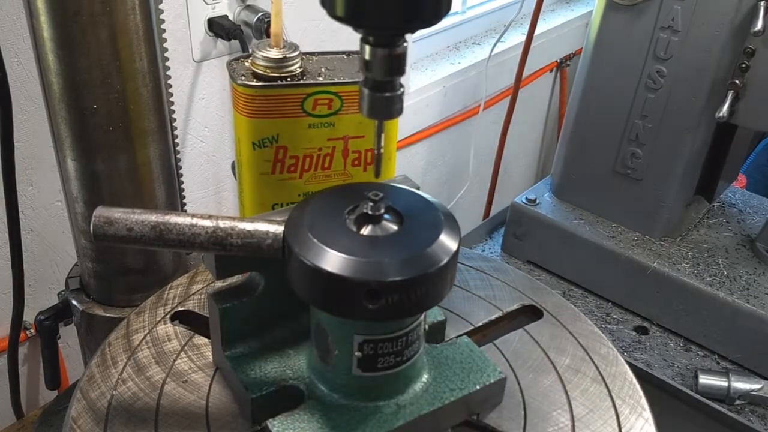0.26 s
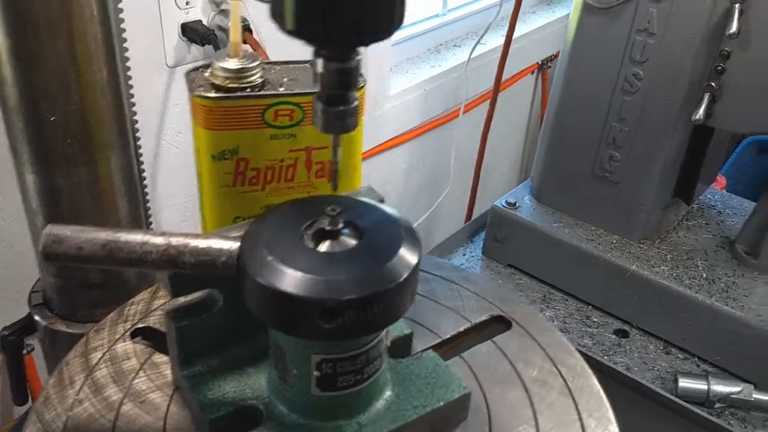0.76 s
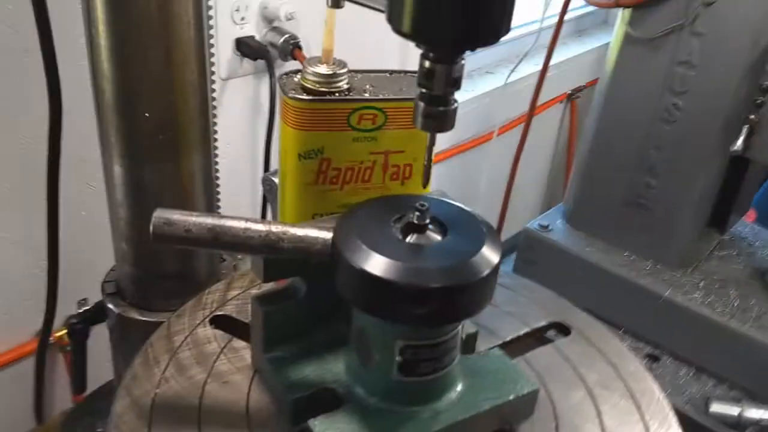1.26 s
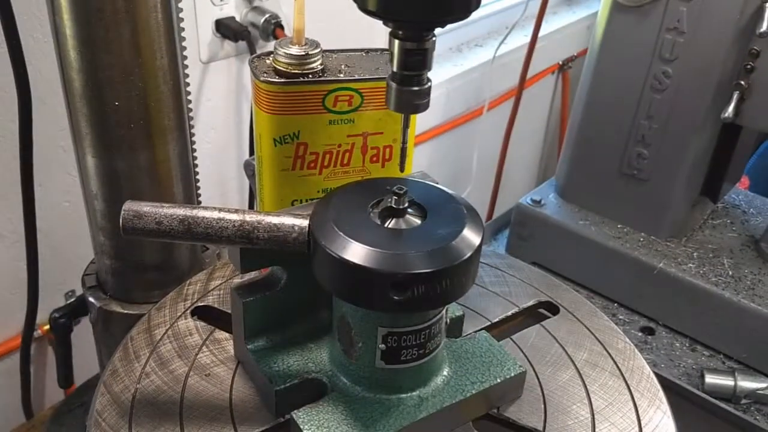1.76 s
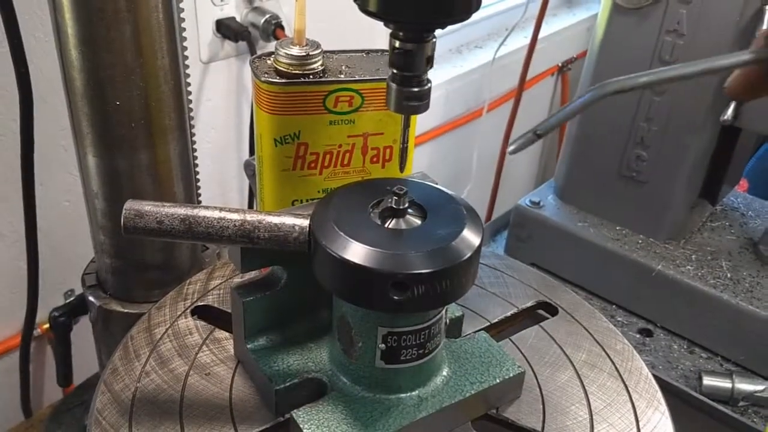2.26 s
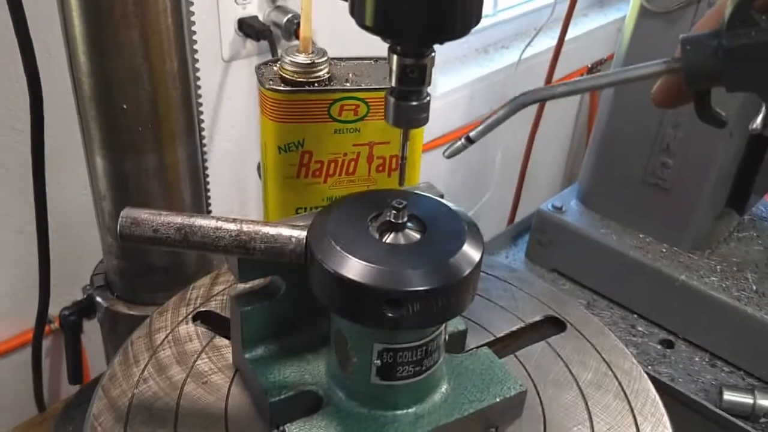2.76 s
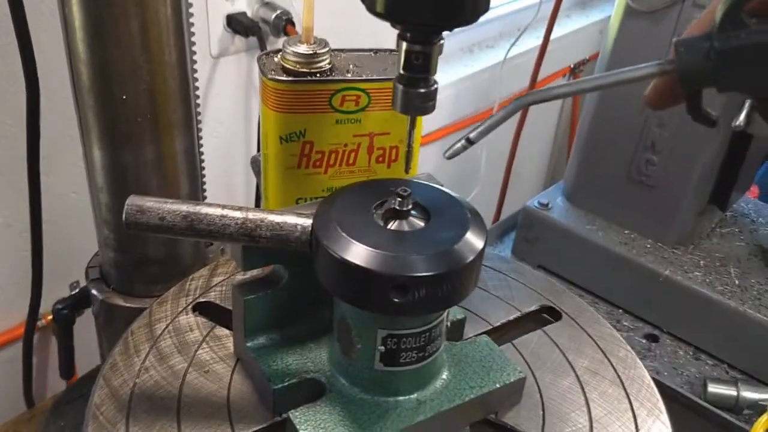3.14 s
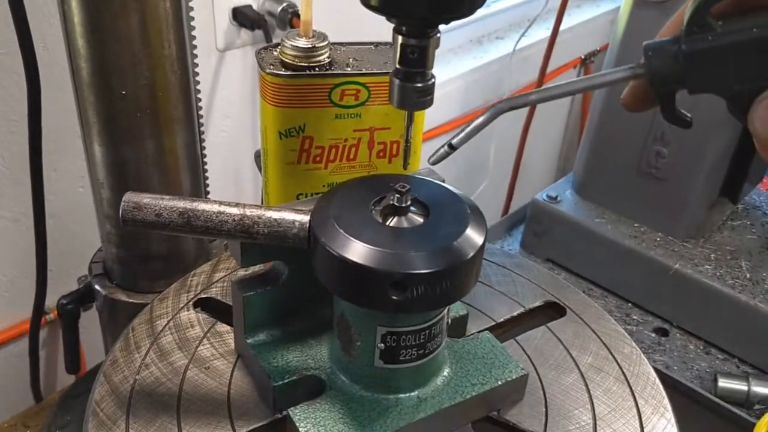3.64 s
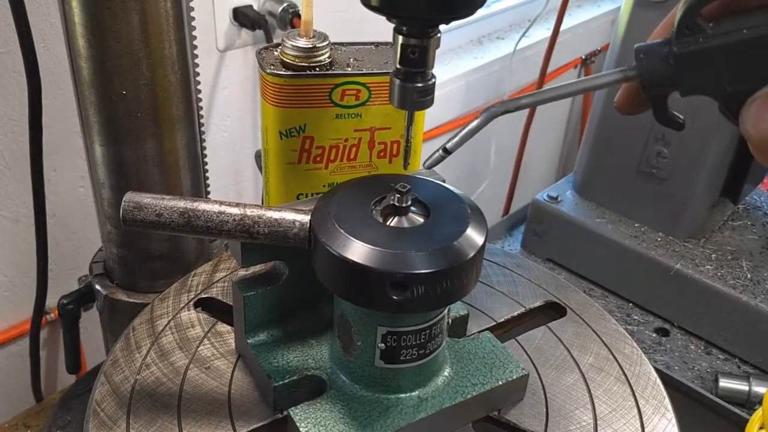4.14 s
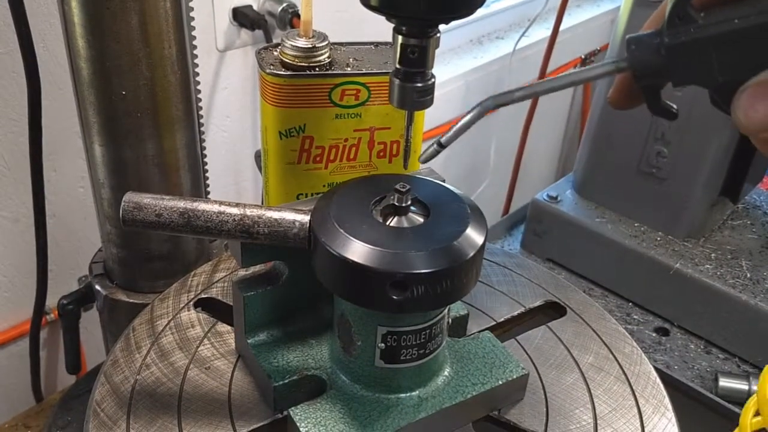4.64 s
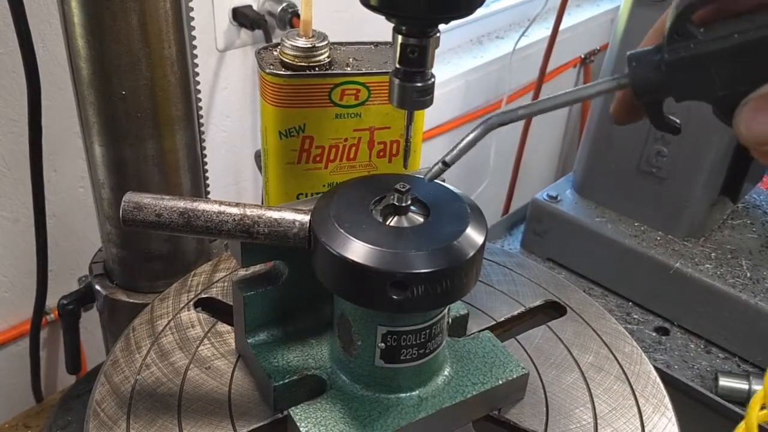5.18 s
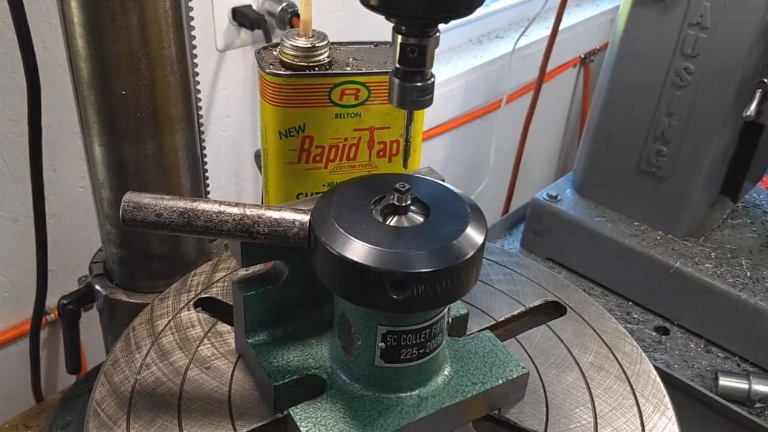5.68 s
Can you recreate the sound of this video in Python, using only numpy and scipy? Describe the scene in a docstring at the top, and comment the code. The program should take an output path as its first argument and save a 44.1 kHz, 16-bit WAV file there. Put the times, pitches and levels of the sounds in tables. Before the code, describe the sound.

Machine rattle and gear drone slow to near rest after a switch snap, followed by small handling clicks and three loud air-gun bursts.

```python
"""Workshop: a drill press with a tapping head coasts almost to rest; gears and clutch rattle, the casting drones.
The machine is shaped noise, gear-mesh sines and clacks timed by the slowing spindle.
Mains hum and fan noise lie behind; hands thud on the camera and click as they pick up an air gun.
Three air blasts follow: hiss, roar, a singing hole and wall echo, all turbulent or resonant noise.
A stereo widener combs the sound, and a gain control ducks loud passages."""
import sys
import numpy as np
from scipy import signal
from scipy.fft import rfft, irfft, next_fast_len
from scipy.io import wavfile
from scipy.ndimage import uniform_filter1d, map_coordinates

SR = 44100
rng = np.random.default_rng(int(sys.argv[2]) if len(sys.argv) > 2 else 0)


def wav_out(sig):
    """Save sig, one row per channel (or a flat mono array), as 16-bit PCM at SR to the path in sys.argv[1]."""
    wavfile.write(sys.argv[1], SR, np.round(np.clip(np.atleast_2d(sig).T, -1, 1) * 32767).astype(np.int16))


N = 260627
T = np.arange(N) / SR  # s

# All levels are relative dB unless said otherwise.
# Spindle slowing down. Each row: time in seconds, speed in turns per second.
SPINDLE_SPEED = [(0, 24.3), (.9, 19.24), (2.4, 8), (3.6, 0.8)]
# Gear tooth meshes. Each row: multiple of the spindle rate, level in dB.
GEAR_MESHES = [(15, -13), (27, -14), (43, -27)]
# Casting noise. Each row: frequency in Hz, level in dB per Hz.
CASTING_SPECTRUM = [(80, 5), (190, -3.5), (280, 4), (380, 1), (470, -2.5), (600, -6), (720, -3.5),
                    (950, -6), (1250, -4.5), (1600, -15.5), (2000, -4.5)]
# Casting resonances. Each row: frequency in Hz, width in Hz, level in dB.
CASTING_RESONANCES = [(273, 15, -4), (587.2, 13, 1), (679.6, 26, -7.5), (1255, 16, -8.5), (1525, 58, -13.5),
                      (1776, 5.9, -7)]
# Steel tapping head. Each row: frequency in Hz, level in dB per Hz.
HEAD_SPECTRUM = [(1800, -4.5), (2500, -2), (3200, -15.5), (4500, -9), (5700, -10), (6500, 1), (7300, -5),
                 (8100, -10), (10500, -15), (12500, -13.5), (13800, -10.5), (14700, 1.5), (15700, -13)]
# Hardest clutch clacks. Each row: time in seconds, level in dB.
CLUTCH_CLACKS = [(0.0447, -22.5), (0.158, -18.5), (0.2672, -20.5), (0.349, -22.5), (0.4, -22),
                 (0.5365, -19.5), (0.6684, -21.5), (0.828, -18), (0.853, -24.5), (1.3845, -24)]
# Air blasts. Each row: valve open in seconds, valve starts to shut in seconds, extra hiss rise in seconds,
# roar in dB, hiss in dB, singing in dB over the hiss.
AIR_BLASTS = [(4.421, 4.931, 0.013, -25.5, -21.5, -13.5), (5.081, 5.166, 0.0012, -24, -20.5, -10.5),
              (5.289, 5.344, .001, -23, -23.5, -34)]
# Air jet. Each row: frequency in Hz, level in dB per Hz.
AIR_SPECTRUM = [(25, -11.5), (60, 3), (140, 3), (300, -3), (600, -6), (1300, -8), (2800, -10.5),
                (4000, -10), (4700, -9.5), (5300, -11), (6700, -7), (8300, -11.5), (11000, -15.5),
                (14200, -14), (15600, -16)]
# Singing hole. Each row: frequency in Hz, width in Hz, level in dB.
BORE_RESONANCES = [(6040, 370, 3), (6460, 240, 2.5), (6630, 120, 8.5)]
# Jet sweeping over the hole. Each row: time in seconds, half length in seconds, jet gain in dB, singing gain in dB.
HOLE_CROSSINGS = [(4.687, 0.048, -0.45, 10), (4.83, .055, 3, 10)]
# Room decay. Each row: frequency in Hz, t60 in seconds.
ROOM_T60 = [(150, .35), (1200, 0.94), (3500, 0.97), (6500, 0.7), (10000, .58), (15000, 0.58)]
# Walls answering the jet. Each row: frequency in Hz, gain in dB.
WALL_GAIN = [(100, -27), (700, -29), (1200, -22.5), (2000, -19), (3500, -9.5), (6500, 1.5), (10000, -0.5),
             (15000, -5)]
# Hollow ring in the jet's echo. Each row: frequency in Hz, width in Hz, level in dB.
ECHO_RESONANCES = [(1215, 60, 5.5)]
# Switch and hand-tool clicks. Each row: time in seconds, level in dB, bright edge in dB over it.
TOOL_CLICKS = [(0.9809, -20.5, 5.5), (1.261, -25.5, -26), (2.2997, -50, 1), (2.3667, -31.5, -30),
               (2.535, -40, -23), (2.598, -37.5, -8), (2.7384, -32, -15), (3.0165, -37, -11),
               (3.0792, -36.5, -13.5)]
# Click body. Each row: frequency in Hz, level in dB per Hz.
CLICK_SPECTRUM = [(300, -2.5), (1500, -8.5), (3000, 0), (6000, -10.5), (8000, -19.5), (16000, -24)]
# Housing ring after the first click. Each row: frequency in Hz, level in dB, t60 in seconds.
SWITCH_RING = [(561, -29, 0.33), (963, -31.5, 0.18)]
# Hands on the camera. Each row: time in seconds, level in dB, half length in seconds.
HAND_BUMPS = [(1.257, -37, 0.058), (1.42, -46, 0.17), (2.392, -33, 0.032), (2.472, -39, 0.093),
              (3.09, -34.5, 0.095)]
# Mains hum. Each row: time in seconds, level in dB before HUM_MAKEUP_DB.
HUM_LEVEL = [(0.0, -62.5), (0.23, -56.5), (1.27, -58), (2.07, -50.5), (3.24, -49), (4.3, -52.5)]
# Fan noise. Each row: frequency in Hz, level in dB per Hz.
FAN_SPECTRUM = [(25, -26.5), (60, 4), (170, 0), (250, -1), (420, -6), (650, -9), (810, -3), (950, -14),
                (1200, -19), (1700, -19), (3500, -21.5), (6500, -30.5), (10000, -37.5), (15500, -38)]
# Fan resonances. Each row: frequency in Hz, width in Hz, level in dB.
FAN_RESONANCES = [(402, 39, -6.5), (805, 45, -6), (1117, 39, -10), (1231, 12, -12.5)]
# Side signal against mid. Each row: frequency in Hz, gain in dB.
SIDE_GAIN = [(60, -18), (200, -18.5), (450, -7), (1300, 0), (12500, 0.5)]
# Stereo widener. Each row: frequency in Hz, share of the opposite channel subtracted.
CROSSFEED_SHARE = [(300, 0.94), (2300, 0.75), (4600, 0.72), (7000, 0.5), (12000, 0.33)]

SWITCH_OFF_S, UNLOAD_S = 0.985, 0.037  # drive lets go, and how long that takes
FULL_SPEED_TPS = 27.2  # turns per second; reference for both levels below
DRONE_DB, DRONE_DB_PER_OCTAVE, DRONE_DROP_DB = -36, 3.5, 2.5  # drop: once the drive lets go
RATTLE_DB, RATTLE_DB_PER_OCTAVE, RATTLE_DROP_DB = -33.5, 7, 4
CRITICAL_TPS, CRITICAL_WIDTH_TPS, CRITICAL_DB = 10.14, 2.05, 5.5  # casting shakes harder near here
SEAT_TPS, HOLDER_SEAT_TPS = 8.1, 10.2  # loose parts and light tap holder settle below these speeds
FLUTTER_DB = 1  # uneven flurries of the rattle
SLAP_DB, SLAP_SCATTER_DB = 0.5, 1.5  # light clack each turn, over the rattle
SHUDDER_DB, SHUDDER_RISE_S, SHUDDER_T60_S = -9.5, 0.011, 0.18  # casting's answer to a hard clack
SURGE_DB, SURGE_PEAK_S, SURGE_WIDTH_S = 3, 0.034, 0.023  # air stored in the hose, after the valve opens
CLICK_T60_S = 0.059
HUM_MAKEUP_DB = 14.5  # offsets the widener's loss
CROSS_DELAY_S = 19 / 44100
TOP_HZ = 15900


def amp(db):
    """Decibels to gain."""
    return 10 ** (np.asarray(db) / 20)


def unit(x):
    """Scale to rms 1."""
    return x / np.sqrt(np.mean(x ** 2) + 1e-20)


def along(points, hz):
    """Interpolate (Hz, value) points on a log frequency axis."""
    point_hz, values = np.transpose(points)
    return np.interp(np.log(hz + 1), np.log(point_hz + 1), values)


def curves(rows):
    """One value per sample for each column after the time."""
    times_s, *columns = np.transpose(rows)
    return [np.interp(T, times_s, column) for column in columns]


def wobble(rate_hz):
    """Smooth random curve, rate_hz knots a second."""
    knots = rng.standard_normal(int(N * rate_hz / SR) + 4)
    return map_coordinates(knots, [T * rate_hz])


def bell(x, centre, width):
    """Smooth hump of height 1."""
    return np.exp(-((x - centre) / width) ** 2)


def filtered(x, response):
    """x through a complex response of frequency."""
    size = next_fast_len(N + SR // 2)
    hz = np.fft.rfftfreq(size, 1 / SR)
    return irfft(rfft(x, size) * response(hz), size)[..., :N]


def coloured(x, spectrum):
    """x through a (Hz, dB) spectrum."""
    return filtered(x, lambda hz: amp(along(spectrum, hz)))


def resonate(x, modes):
    """x through parallel (Hz, width, dB) resonances of alternating sign."""
    def response(hz):
        total = 0
        for k, (centre_hz, width_hz, db) in enumerate(modes):
            damping = 1j * hz * width_hz
            total = total + (-1) ** k * amp(db) * damping / (centre_hz ** 2 - hz ** 2 + damping)
        return total
    return filtered(x, response)


def below(x, edge, order=8):
    """Low-pass gain; also used on speed."""
    return 1 / np.sqrt(1 + (x / edge) ** order)


def above(x, edge, order=8):
    """High-pass gain, power complement of below()."""
    return np.sqrt(1 - below(x, edge, order=order) ** 2)


def noise(lean):
    """White noise as (mid, side); lean > 0 is towards the left port."""
    a, b = rng.standard_normal((2, N))
    lean = np.clip(lean, -1, 1)
    return np.array([a, lean * a + np.sqrt(1 - lean ** 2) * b])


def strike(start_s, t60_s, attack_s):
    """Envelope of a blow: exponential rise and decay."""
    t = np.maximum(T - start_s, 0)
    return (1 - np.exp(-t / attack_s)) * amp(-60 * np.minimum(t / t60_s, 4))


def impacts(rate_hz, scatter_db, t60_s):
    """Envelope of rms 1: random small blows whose decaying powers add."""
    strength = amp(scatter_db * rng.standard_normal(N)) ** 2
    blows = (rng.random(N) < rate_hz / SR) * strength
    decay = amp(-60 * np.arange(SR // 10) / SR / t60_s) ** 2
    power = np.abs(signal.fftconvolve(blows, decay)[:N])
    return unit(np.sqrt(power))


def machine_levels(speed):
    """Drone and rattle in dB: both fall with speed and drop when the drive lets go."""
    octaves = np.log2(np.maximum(speed, .1) / FULL_SPEED_TPS)
    coasting = np.clip((T - SWITCH_OFF_S) / UNLOAD_S, 0, 1)
    critical_db = CRITICAL_DB * bell(speed, CRITICAL_TPS, CRITICAL_WIDTH_TPS)
    drone_db = DRONE_DB + DRONE_DB_PER_OCTAVE * octaves - DRONE_DROP_DB * coasting + critical_db
    rattle_db = RATTLE_DB + RATTLE_DB_PER_OCTAVE * octaves - RATTLE_DROP_DB * coasting
    return drone_db, rattle_db


def drill_press():
    """The spindle's turns drive the casting drone and the loose head's rattle."""
    speed, = curves(SPINDLE_SPEED)
    drone_db, rattle_db = machine_levels(speed)
    turns = np.cumsum(speed) / SR
    # mainly twice a turn
    chatter = amp(1.0 * np.cos(4 * np.pi * turns) + 0.3 * np.cos(2 * np.pi * turns))
    moving = np.tanh(np.abs(speed) / 5)
    return moving * casting(turns, chatter, drone_db) + tapping_head(speed, turns, chatter, rattle_db)


def casting(turns, chatter, drone_db):
    """Knocks, resonances and gear mesh drone in the casting; hard clacks shake it."""
    knocks = noise(0.44) * impacts(640, scatter_db=1.5, t60_s=0.053) * amp(0.9 * np.cos(2 * np.pi * turns))
    band = lambda hz: below(hz, 2310) * above(hz, 110, order=4)
    body = unit(filtered(knocks, lambda hz: amp(along(CASTING_SPECTRUM, hz)) * band(hz)))
    ring = amp(2.4 * wobble(14)) * unit(resonate(noise(.85) * chatter, CASTING_RESONANCES))
    mesh = 0
    for order, db in GEAR_MESHES:
        level = amp(db + 2.8 * wobble(12))
        mesh = mesh + level * np.sin(2 * np.pi * order * turns + 0.78 * wobble(26))
    shudder = sum(amp(db + SHUDDER_DB) * strike(s, SHUDDER_T60_S, SHUDDER_RISE_S) for s, db in CLUTCH_CLACKS)
    return np.hypot(amp(drone_db), shudder) * (amp(-4.0) * body + amp(-6.5) * ring + mesh)


def tapping_head(speed, turns, chatter, rattle_db):
    """Gears and tap holder rattle apart, each a dense stream of tiny contacts, under clutch clacks."""
    loose = amp(rattle_db) * above(speed, SEAT_TPS, order=12)
    clacks = sum(amp(db - 6.0) * strike(s, t60_s=0.04, attack_s=0.0005) for s, db in CLUTCH_CLACKS)
    clacks = clacks + loose * slaps(turns, t60_s=.035)
    rattle = loose * unit(chatter) * amp(FLUTTER_DB * wobble(44.8))
    teeth = np.hypot(rattle * impacts(1300, scatter_db=3.5, t60_s=0.018), clacks)
    holder_loose = above(speed, HOLDER_SEAT_TPS, order=10)
    holder_rattle = rattle * holder_loose * impacts(900, scatter_db=2.0, t60_s=0.015)
    ticks = np.hypot(holder_rattle, clacks * amp(-1.5))
    gears = filtered(noise(.3) * teeth, lambda hz: above(hz, 1900) * below(hz, 10000))
    holder = filtered(noise(.3) * ticks, lambda hz: above(hz, 9900))
    return coloured(gears + holder, HEAD_SPECTRUM) * amp(8.5)


def slaps(turns, t60_s):
    """Envelope of one light clack a turn, each of its own strength."""
    strength = amp(SLAP_DB + SLAP_SCATTER_DB * rng.standard_normal(N))
    blows = np.diff(np.floor(turns), prepend=0) * strength
    return signal.fftconvolve(blows, amp(-60 * T[:SR // 10] / t60_s))[:N]


def air_gun():
    """The valve hisses as it opens; at full flow the jet roars on the part and sings in its hole."""
    roar_db, hiss_db, bore_db = jet_levels()
    air = lambda hz: amp(along(AIR_SPECTRUM, hz))
    roar = unit(filtered(noise(0.35), lambda hz: air(hz) * below(hz, 2800, order=20)))
    hiss = unit(filtered(noise(.2), lambda hz: air(hz) * above(hz, 2300, order=20)))
    # turbulence makes both flutter
    leak = amp(hiss_db - 1.5 + 0.29 * wobble(200)) * valve(rise_s=0.044, fall_s=0.072, extra_share=0.56)
    gush_db = roar_db + 0.86 * wobble(250) + 1.0 * wobble(35)
    gush = amp(gush_db) * valve(rise_s=0.022, fall_s=0.033, extra_share=0)
    bore = leak * amp(bore_db) * unit(resonate(noise(.1), BORE_RESONANCES))
    jet = gush * roar + leak * hiss + bore
    # more of the singing hole than of the jet reaches the walls
    echo = room(amp(-13.0) * coloured(jet, WALL_GAIN) + amp(-10.0) * bore)
    mid, side = amp(20) * (jet + echo + resonate(echo, ECHO_RESONANCES))
    # gap at 2.1-2.6 kHz in the mid only, left by lossy audio coding
    mid = filtered(mid, lambda hz: below(hz, 2104, order=70) + above(hz, 2605, order=70) + amp(-29.0))
    return np.array([mid, side])


def jet_levels():
    """Roar, hiss and singing in dB: blasts surge, settle, and swell where they cross the hole."""
    rows = []
    for open_s, shut_s, _, *levels_db in AIR_BLASTS:
        rows += [(open_s, *levels_db), (shut_s, *levels_db)]
    roar_db, hiss_db, bore_db = curves(rows)
    swell_db = sum(SURGE_DB * bell(T, open_s + SURGE_PEAK_S, SURGE_WIDTH_S) for open_s, *_ in AIR_BLASTS)
    swell_db = swell_db + sum(db * bell(T, s, half_s) for s, half_s, db, _ in HOLE_CROSSINGS)
    singing_db = sum(db * bell(T, s, half_s) for s, half_s, _, db in HOLE_CROSSINGS)
    return roar_db + swell_db, hiss_db + swell_db, bore_db + singing_db


def valve(rise_s, fall_s, extra_share):
    """Gain of the air flow, linear in dB: rise_s and fall_s span 60 dB, plus a share of the extra rise."""
    flow = 0
    for open_s, shut_s, extra_s, *_ in AIR_BLASTS:
        delay_s = extra_share * extra_s
        opening = (open_s + delay_s - T) / (rise_s + delay_s)
        closed = np.maximum(opening, (T - shut_s) / fall_s)
        flow = flow + amp(-60 * np.clip(closed, 0, 3))
    return flow


def room(x):
    """Workshop reverberation: noise tail whose bands die at their own speeds."""
    hz, t, z = signal.stft(rng.standard_normal((2, SR)), SR, nperseg=256)
    decay = amp(-60 * t / along(ROOM_T60, hz)[:, None])
    tail = signal.istft(z * decay, SR, nperseg=256)[1]
    return signal.fftconvolve(x, tail / np.linalg.norm(tail[0]), axes=1)[:, :N]


def clicks():
    """A switch snaps and rings the housing; the air gun ticks as it is picked up."""
    shapes = []
    for s, db, _ in TOOL_CLICKS:
        diffuse_tail = amp(-21) * strike(s, 0.63, attack_s=0.01)
        shapes.append(amp(db) * (strike(s, CLICK_T60_S, attack_s=0.0032) + diffuse_tail))
    snap = coloured(sum(shapes) * noise(0.13), CLICK_SPECTRUM) * amp(5.5)
    top = sum(shape * amp(edge_db + 4) for shape, (_, _, edge_db) in zip(shapes, TOOL_CLICKS))
    edge = filtered(top * noise(0.34), lambda hz: above(hz, 4300) * below(hz, 9200))
    ring = 0
    for hz, db, t60_s in SWITCH_RING:
        envelope = amp(db) * strike(TOOL_CLICKS[0][0], t60_s, attack_s=0.016)
        ring = ring + envelope * np.sin(2 * np.pi * hz * T + .5 * wobble(62.0))
    return snap + edge + ring


def handling():
    """Hands on the camera: soft low-band thuds over a faint constant rumble."""
    push = sum(amp(db) * bell(T, s, half_s) for s, db, half_s in HAND_BUMPS) + amp(-48.5)
    thud = unit(filtered(noise(0), lambda hz: above(hz, 28, order=6) * below(hz, 92, order=4)))
    return push * thud * amp([[-5], [-8]])  # mid, side


def workshop():
    """Mains hum at 120 Hz and resonant fan noise; the fan follows half the hum's swing in dB."""
    hum_db, = curves(HUM_LEVEL)
    hum_gain = amp(hum_db + HUM_MAKEUP_DB + 0.6 * wobble(9))
    hum = hum_gain * np.sin(2 * np.pi * 120 * T + .16 * wobble(6.4))
    fan = unit(coloured(noise(0.25), FAN_SPECTRUM))
    fan = fan + amp(-11.0) * unit(resonate(noise(.7), FAN_RESONANCES))
    fan_db = -47.0 + .5 * (hum_db - hum_db[-1]) + .8 * wobble(12)
    return hum + amp(fan_db) * fan


def scene():
    """All sources at the two microphone ports."""
    mid, side = drill_press() + clicks() + workshop()
    mid, side = np.array([mid, coloured(side, SIDE_GAIN)]) + handling() + air_gun()
    return np.array([mid + side, mid - side]) * amp([[-.2], [.2]])


def record(dry):
    """Stereo widener, gain control with a slow release, converter hiss, band limit."""
    # each channel loses a delayed copy of the other
    share = lambda hz: np.clip(along(CROSSFEED_SHARE, hz), 0, 1)
    cross = lambda hz: share(hz) * np.exp(-2j * np.pi * hz * CROSS_DELAY_S)
    wide = dry - filtered(dry[::-1], cross)
    # narrow the highest treble
    wide = wide - 0.4 * filtered(wide - wide[::-1], lambda hz: above(hz, 13400, order=60))
    power = np.abs(uniform_filter1d(np.mean(wide ** 2, axis=0), size=600))
    level_db = 10 * np.log10(power + 1e-12)
    excess_db = np.maximum(level_db + 13.0, 0)
    release_db = 1.5 * T  # 1.5 dB per second
    duck_db = np.maximum.accumulate(excess_db + release_db) - release_db
    hiss = amp(-76) * rng.standard_normal((2, N))
    return filtered(wide * amp(-duck_db) + hiss, lambda hz: below(hz, TOP_HZ, order=240))


dry = scene()
out = record(dry)
wav_out(out)
```